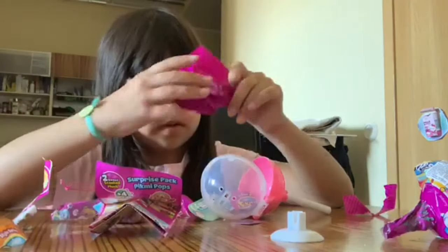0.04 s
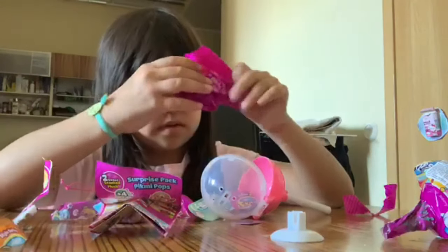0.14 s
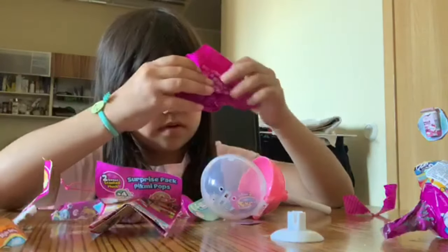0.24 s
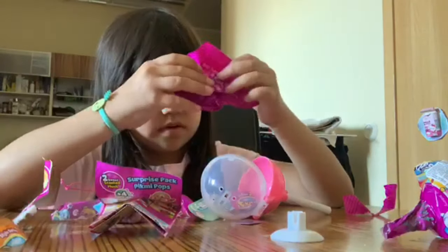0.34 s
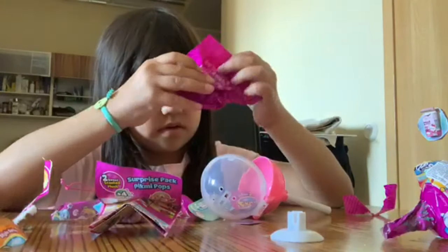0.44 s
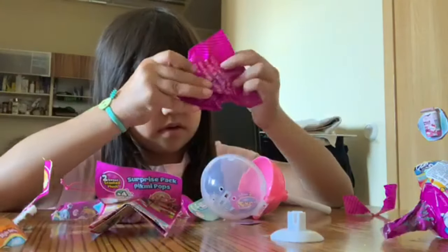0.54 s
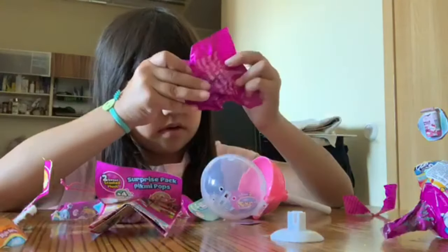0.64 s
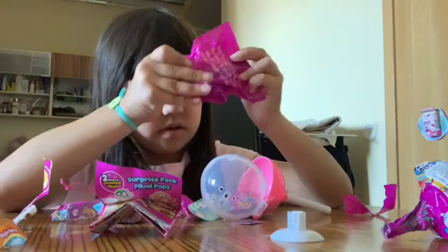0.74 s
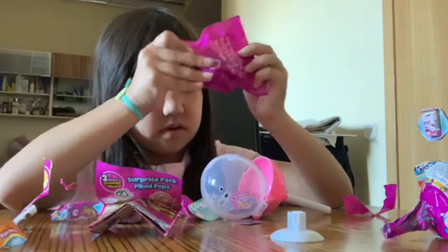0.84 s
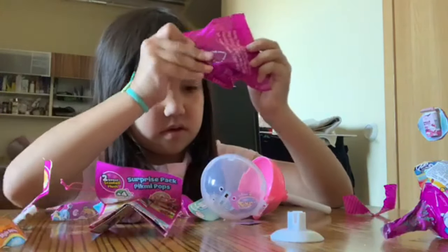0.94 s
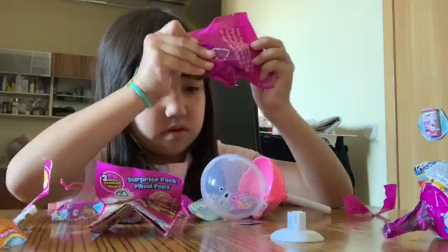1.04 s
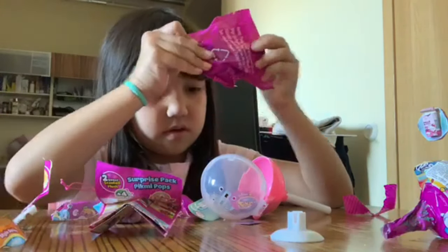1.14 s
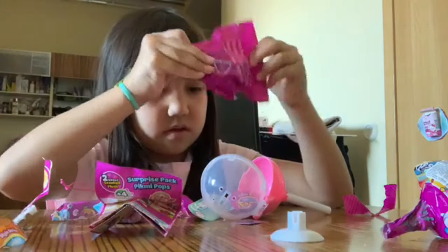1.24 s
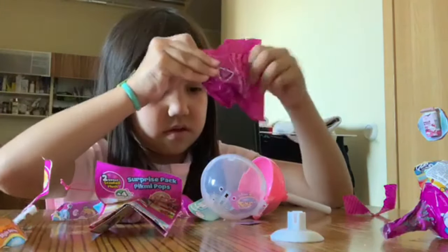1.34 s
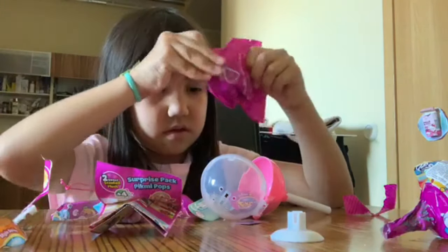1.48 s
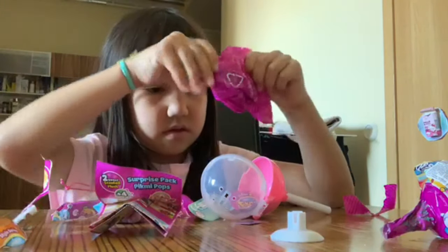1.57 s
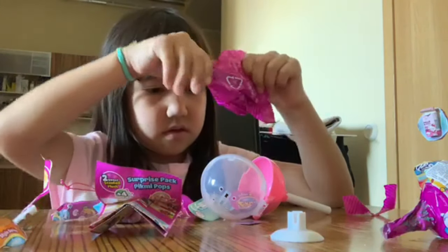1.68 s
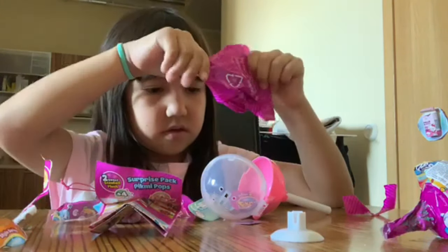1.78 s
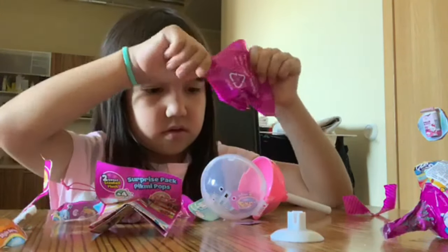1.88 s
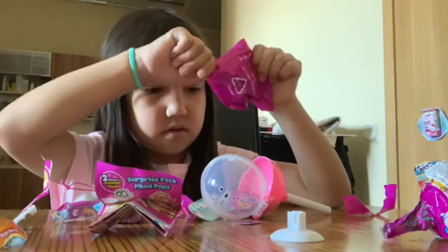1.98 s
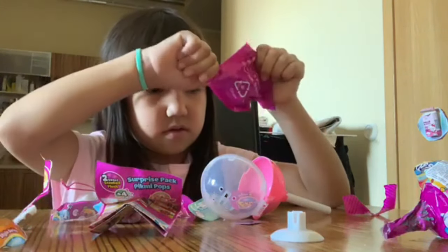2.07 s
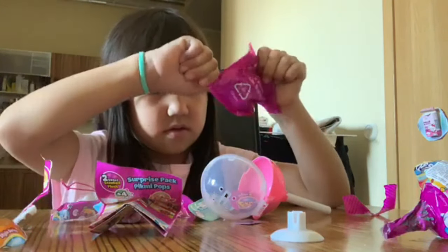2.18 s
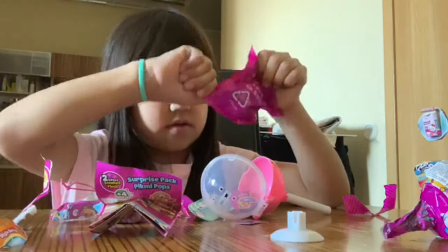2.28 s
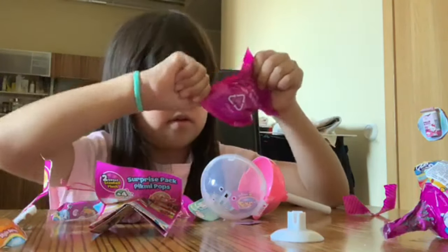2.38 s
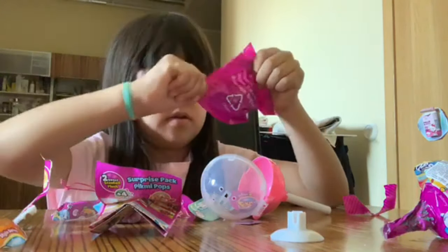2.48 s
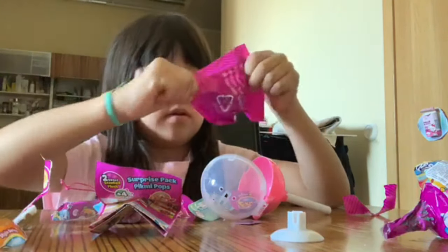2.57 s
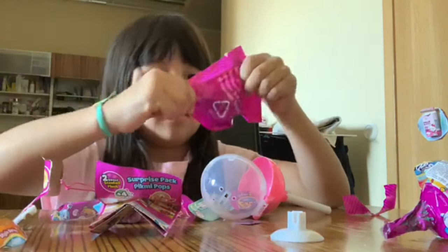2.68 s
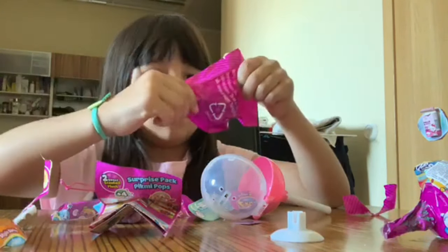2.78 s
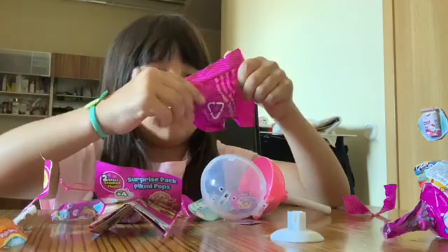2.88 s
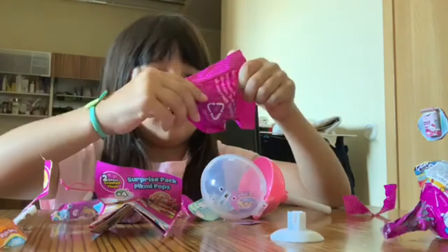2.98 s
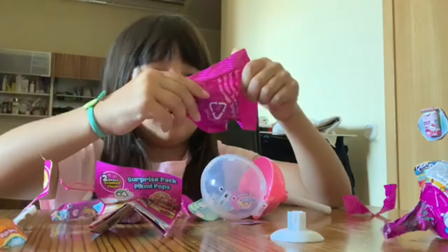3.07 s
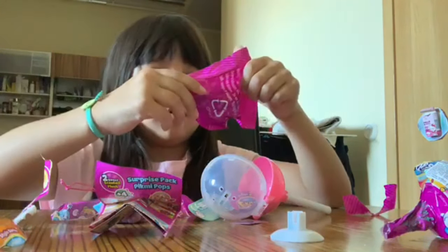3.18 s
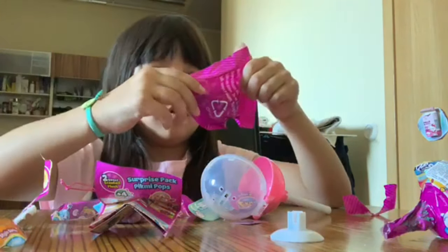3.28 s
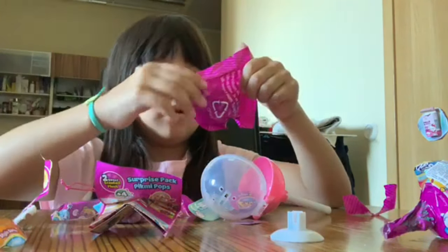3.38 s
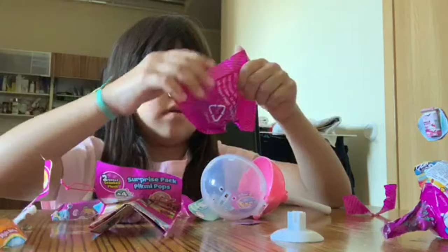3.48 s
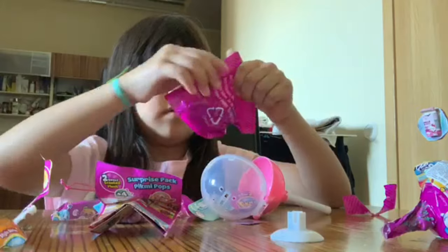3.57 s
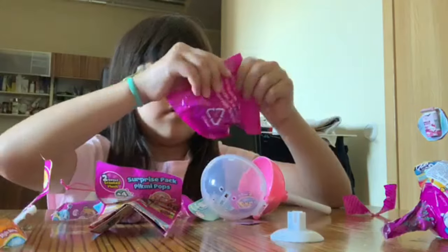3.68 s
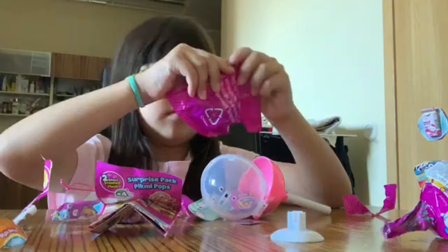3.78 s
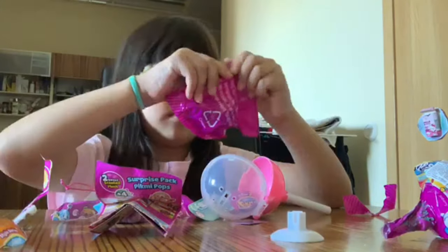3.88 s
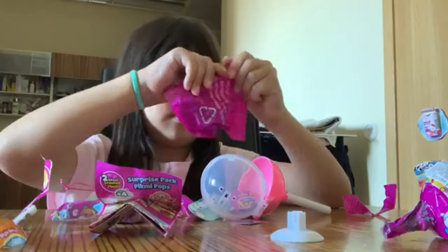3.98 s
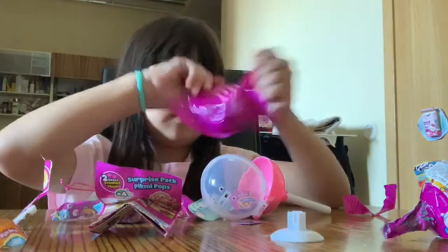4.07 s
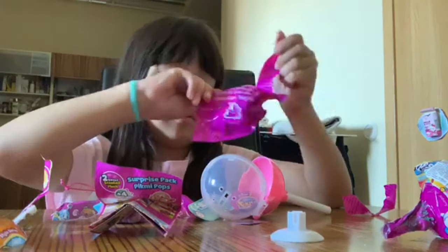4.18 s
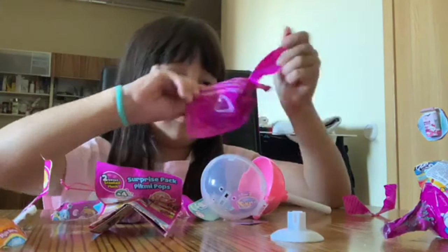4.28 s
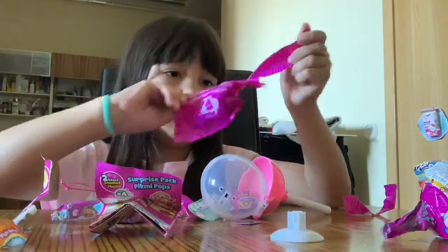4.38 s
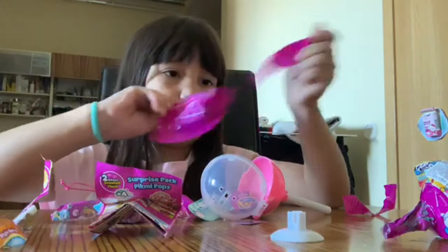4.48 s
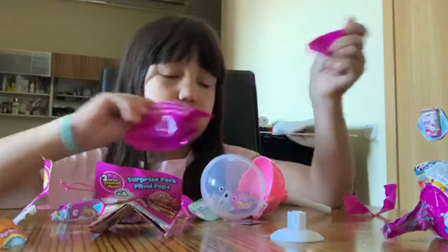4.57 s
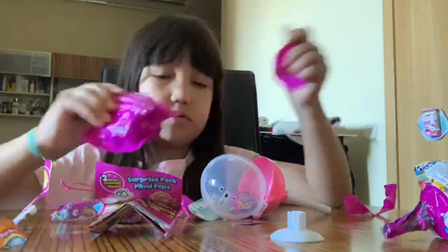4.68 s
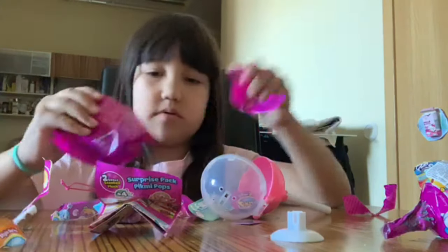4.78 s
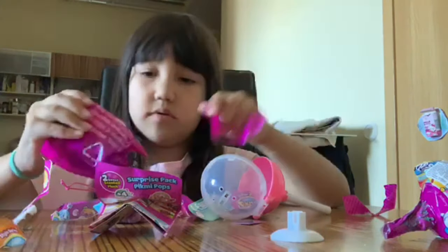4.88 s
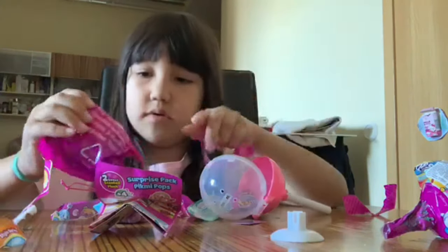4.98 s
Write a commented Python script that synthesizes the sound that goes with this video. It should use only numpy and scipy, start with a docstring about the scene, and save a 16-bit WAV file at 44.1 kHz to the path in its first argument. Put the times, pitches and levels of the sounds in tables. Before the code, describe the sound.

Hands crinkle a small foil packet close to the microphone, making irregular sharp snaps and swells of fine crackle with each squeeze. About halfway the packet jerks with a soft thump, a finger briefly drags across it, and the handling thins out. Then, with another thump, the seam rips open in three quick jerks. A last flurry of snaps dies down. The quiet room hums faintly and adds a slight echo.

```python
"""A quiet room hums. From the first instant, hands crinkle a foil packet above a table, close to a
two-port microphone: each buckle of the foil snaps, fine crackle swells with each squeeze, the walls answer.
At 2.1 s the packet jerks with a soft thump; at 2.5 s a finger drags across it, and the handling thins out.
Just after 4 s another thump, and the seam rips open in three jerks. A last flurry of snaps, with a third
thump, dies down towards 5 s."""
import sys
import numpy as np
from scipy import signal
from scipy.fft import rfft, irfft, next_fast_len
from scipy.io import wavfile
from scipy.ndimage import uniform_filter1d

SR = 44100
rng = np.random.default_rng(int(sys.argv[2]) if len(sys.argv) > 2 else 0)


def inscribe(sig):
    """Save sig as 16-bit PCM at rate SR to the path in sys.argv[1].

    A 1-D sig is mono; a 2-D sig holds one channel per row.
    Samples are clipped to [-1, 1] before scaling.
    """
    pcm = np.round(np.clip(np.atleast_2d(sig).T, -1, 1) * 32767)
    wavfile.write(sys.argv[1], SR, pcm.astype(np.int16))


N = 221815

# room tone spectrum, the sub bass and the rest: f/Hz, relative level/dB
SUB_TONE = [(10, -23.5), (30, 3.5), (60, -8.0)]
ROOM_TONE = [(90, -2.5), (230, -9), (669, -15.5), (820, -12), (1080, -21), (7530, -45), (8580, -68),
             (9360, -70), (15500, -71.5), (16500, -63)]
# two low drones wax and wane: t/s, lower drone/dB, upper drone/dB
DRONE_FADES = [(0.0, -54.5, -57), (1.5, -55.5, -62.5), (1.9, -78, -56), (2.4, -57, -59.5),
               (3.6, -54.5, -58), (4.0, -74.5, -57), (5.03, -57, -51)]
# how alike the room sounds in the two ports: f/Hz, correlation
ROOM_LIKENESS = [(60, 0.89), (250, 0.96), (450, 0.55), (800, 0.13), (1400, 0.096), (3000, 0)]
# fingers squeeze: full pressure at t/s, hold/s, crackle level/dB, relative pops/dB, relative ticks/dB
SQUEEZE_CUES = [(0.001, 0.0084, -53, -6, 6), (.1, 0.29, -54, -4.5, -7), (.56, 0.01, -46, -1.5, -4),
                (.72, 0.12, -43, -6, -1.5), (.97, 0.076, -42, -10, -5), (1.27, 0.032, -48, -7, -3),
                (1.58, 0.053, -45.5, -8.5, -6), (1.92, 0.24, -44, -12.5, -11), (2.52, 0.14, -45, -22, -7),
                (3.8, 0.049, -49.5, -5, -5), (4.4, 0.18, -48, -8, -4), (4.78, 0.053, -56.5, -19, -6)]
# the foil buckles: t/s, level/dB, centre f/Hz, relative low pop/dB, relative bright tick/dB
BUCKLE_CUES = [(0.018, -49, 2520, 7, 14), (0.0473, -22, 2210, -9.5, 4), (0.053, -16.5, 2520, -14, -10),
               (0.1206, -28, 3850, -30, -13), (0.1713, -23, 2630, -10, 9), (0.1992, -29, 2520, -23, 6),
               (0.2214, -24.5, 1940, -30, -7), (0.2508, -28.5, 1750, -33, -29),
               (0.2558, -26.5, 3170, -38, 5.5), (0.319, -27, 1740, -16, -28),
               (0.3315, -22.5, 1930, -31, -14), (0.3621, -28.5, 2430, -37, 16.5),
               (0.3706, -25, 2540, -32, -2), (0.38, -26, 1520, -7.5, -7), (0.4309, -35, 2100, -8, 14),
               (0.4753, -34, 1310, -4, -20), (0.5191, -28, 1940, -13, 4), (0.5449, -13, 2070, -11.5, 5.5),
               (0.5484, -19, 1690, -23, 5.5), (0.567, -24, 3700, -4.5, -12), (0.5901, -27, 3070, -14, 6),
               (0.6513, -10.5, 2300, -8, -11), (0.678, -36, 2500, -8, 12), (0.6871, -14, 1730, -6.5, -5),
               (0.729, -27, 1960, -1, 0), (0.762, -27.5, 2000, -4, 13.5), (0.786, -11, 1800, -26, -4),
               (0.8169, -30, 2060, -16, 6), (0.8782, -25.5, 1900, -35, -3.5),
               (0.9257, -20.5, 3260, -17, -12), (0.9435, -22.5, 2000, -12, -37),
               (0.958, -19.5, 1480, -29, -19), (0.9639, -21.5, 1450, -7.5, -6),
               (0.976, -21, 2650, -16, -13), (0.987, -26, 2550, -9, -16), (0.9974, -21, 1970, -11, 3),
               (1.0016, -15.5, 1820, -15, -1.5), (1.0073, -32, 2500, -7, 2),
               (1.019, -21.5, 1700, -18, -2.5), (1.0315, -26, 2360, -2.5, -2),
               (1.0761, -15.5, 2400, -4, -16.5), (1.13, -24.5, 1240, -15, -74), (1.196, -34, 1350, 2.5, -9),
               (1.206, -34, 1510, -12, -24), (1.237, -22, 1400, -17, -12.5), (1.2548, -23, 1930, -5.5, 2),
               (1.2679, -23.5, 2460, -33, 3.5), (1.304, -24.5, 2260, -10, -10), (1.357, -28, 2000, -10, -4),
               (1.3742, -26.5, 1360, 0, -10), (1.419, -45.5, 2680, 11.5, 20), (1.44, -36, 1410, 4, -21),
               (1.5071, -29.0, 1500, -1, -33), (1.5377, -18, 1700, -13.5, -4),
               (1.5668, -13.5, 1940, -22, 2), (1.6424, -31, 2220, -13, 15), (1.6538, -27.5, 1510, -3, -26),
               (1.7114, -31, 2360, -2, 3), (1.795, -34.5, 2870, -27, -9), (1.8487, -24.5, 1890, -5.5, -16),
               (1.8573, -29, 1440, 0.5, -17), (1.874, -17.5, 3050, -17, -5.5), (1.901, -23, 2200, 2, 11),
               (1.9118, -17.5, 2600, -19, 1.5), (1.9171, -21.5, 2280, -2, 7), (1.945, -21, 1900, -2, 7),
               (1.9512, -18, 1830, -6, -2), (1.9548, -24.5, 1800, -8, 6), (1.971, -39, 1200, 5, -15),
               (1.981, -24.5, 2180, -10, 3), (1.993, -20, 2350, -5.5, -10), (2.0121, -16.5, 2100, -16, 3),
               (2.02, -33, 2500, -22, 10.5), (2.026, -22.5, 2640, -24, 2), (2.0337, -25.5, 1140, -3, -16),
               (2.062, -25.5, 2870, -22, 13), (2.065, -25, 2510, -16, 3), (2.0747, -24, 1320, -22, -3),
               (2.082, -28, 2060, -7, 1), (2.1146, -26.5, 1400, -10, -1), (2.1246, -30, 3650, -17, 13.5),
               (2.131, -25.5, 2500, -19, -4), (2.1566, -35, 1700, -23, -15), (2.2007, -26, 2120, -11, -2),
               (2.2108, -21, 2050, -14, 8.5), (2.259, -29.5, 2410, -19, -3),
               (2.2803, -28.5, 2380, -22, -2.5), (2.322, -24.5, 1440, -32, -3),
               (2.3494, -26.5, 3760, -40, 6), (2.3793, -19.5, 4950, -22, -18),
               (2.457, -44.5, 2500, -15, 15.5), (2.474, -26, 1650, -10, -20), (2.484, -34, 1400, -8, -27),
               (2.4983, -24, 1350, -13, -8.5), (2.555, -34, 2500, -13, -1), (2.565, -22.5, 2650, -10, -5),
               (2.5834, -17, 2060, -5.5, -2.5), (2.592, -36.5, 2200, 4, 4), (2.6172, -18.5, 3270, -13, 0.5),
               (2.6318, -22.5, 2670, -8, -7), (2.661, -30.5, 1780, 5.5, -21),
               (2.692, -29.5, 2730, -26, -17), (2.7151, -29, 2700, -13, -4.5),
               (2.7456, -33, 2280, -5.5, -3), (2.8461, -29, 2400, -16, -15),
               (2.8683, -30.5, 2520, -13, -20), (2.932, -34.5, 3100, -8.5, -11),
               (2.9394, -30, 1760, -25, -36), (3.009, -37.5, 2360, -7.5, -44), (3.0878, -20, 2780, -5, -5),
               (3.2509, -28.5, 2160, -8.5, -4.5), (3.3453, -26, 2940, -6.5, 0.5), (3.5, -40, 2180, -3, 4.5),
               (3.737, -32, 1120, 3.5, -7), (3.7891, -13.5, 2350, -7.5, -9), (3.892, -21, 3100, -12, -8.5),
               (3.937, -34, 2040, -6, 4.5), (3.9958, -23, 2070, -15, -13), (4.048, -24, 1510, -10, -15),
               (4.0582, -22, 2920, -14, -39), (4.0781, -18, 1800, 3, 2), (4.0838, -18.5, 2850, 0, 2),
               (4.089, -15.5, 3080, -11, -22), (4.105, -21, 2200, -19, -6), (4.108, -13, 2970, -28, -4),
               (4.117, -15, 2900, -20, -10), (4.1229, -14, 2700, -13, -8), (4.1276, -11, 2860, -4, 4.5),
               (4.131, -12, 2520, -8.5, -5), (4.144, -21, 2530, -16, 4), (4.161, -18, 2150, -6.5, -15),
               (4.1637, -18, 3260, -30, -13), (4.1683, -26, 2800, -13, -4), (4.171, -29, 2800, -14, 5),
               (4.1775, -34, 2800, -25, -3), (4.189, -34, 2500, -14, 2), (4.2086, -24.5, 3200, -13, -7),
               (4.2307, -15, 2800, -27, -11), (4.2374, -18, 2760, -12.5, -9),
               (4.359, -22.5, 1950, -20, -0.5), (4.377, -31.5, 2300, -5, 4),
               (4.3872, -18.5, 3130, -19, -1.5), (4.3941, -19, 3220, -7.5, -9), (4.428, -24, 2300, -17, -4),
               (4.448, -34.5, 2660, 1, 15.5), (4.459, -26.5, 1360, -7, -21), (4.5, -24.5, 2020, -2.5, 1.5),
               (4.526, -25.5, 2500, -1, -11), (4.5299, -20, 3290, -10, -18),
               (4.535, -11.5, 2900, -13, -1.5), (4.5385, -13, 2880, -9, 0.5), (4.561, -18, 2500, -22, -22),
               (4.5728, -25, 2600, -18, -8), (4.5777, -13, 2900, -19, -17), (4.6643, -17, 2290, -12, -11.5),
               (4.7186, -28, 3050, -9, -1), (4.732, -22.5, 3200, -18, -25), (4.745, -24.5, 2570, -17, -31),
               (4.7701, -24, 1420, -6.5, -34), (4.799, -24, 2630, -18, 1), (4.8314, -20, 3040, -14.5, -10),
               (4.8814, -33, 1500, -11, -5), (5.0032, -27.5, 2530, -14, -6)]
# spectrum of a foil panel's low pop: f/Hz, level/dB
POP_EQ = [(200, -28), (400, -19.5), (620, -11.5), (740, -6.5), (840, -2), (1000, -7.5), (1300, -13.5),
          (2000, -32.5), (4000, -73)]
# spectrum of a crease's bright tick: f/Hz, level/dB
TICK_EQ = [(2500, -8.5), (4500, -0.5), (6000, -2), (7000, -1.5), (8200, 4), (10000, 3), (13000, 6),
           (16500, 2)]
# peaks and dips from the table and the microphone body: f/Hz, width/Hz, gain/dB
BODY_EQ = [(835, 910, -1.5), (1110, 69, -0.5), (1650, 310, 2.5), (2400, 1340, -5.5), (3320, 160, 1),
           (3540, 300, 1), (3750, 420, -3), (5200, 570, -3), (6240, 1500, 6)]
# the packet's place between the ports: f/Hz, left over right/dB
PAN = [(300, -2), (740, -0.5), (1220, -4.5), (2000, -2), (3300, -1), (5500, 1.5), (12000, 1.5)]
# the right port hears the packet first: f/Hz, phase lead/rad
RIGHT_LEAD = [(500, 0.038), (1100, 0.2), (1750, 0.72), (2400, 1.34), (3500, 1.5), (5400, 2.57),
              (6800, 5.33)]
# the room's reverb by band: f/Hz, t60/s, relative level/dB
REVERB_BANDS = [(120, 0.24, 16.5), (250, 0.19, 14), (976, 0.42, -2), (3200, 0.48, -4), (4700, 0.32, 6),
                (7100, 0.48, 1), (10000, 0.44, -2.5), (15300, 0.35, -6)]
# the whole packet jerks and pushes air: t/s, starting level/dB, starting f/Hz
THUMP_CUES = [(2.113, -30.5, 495), (4.084, -20.5, 475), (4.537, -24.5, 425)]
# fader on the packet's top treble: t/s, gain/dB
SHEEN_FADE = [(2.3, -6), (2.56, -2)]
# the seam gives way: full force at t/s, hold/s, crackle level/dB, relative pops/dB, relative ticks/dB
TEAR_CUES = [(4.08, 0.0063, -36.5, -23, -12), (4.118, 0.014, -24, -13, -6),
             (4.16, 0.0048, -26, -11.5, -2.5)]

SNAP_SAMPLES, PRE_ROLL_SAMPLES = 1024, 64
TIME = np.arange(N) / SR


def gain_of(db):
    """Decibels to gain."""
    return 10 ** (np.asarray(db) / 20)


def unit_rms(x):
    """Each channel at rms 1."""
    return x / np.sqrt(np.mean(x ** 2, -1, keepdims=True) + 1e-20)


def curve(points, hz):
    """A table read on a log frequency axis."""
    f, value = np.transpose(points)
    return np.interp(np.log(hz + 1), np.log(f + 1), value)


def add(mix, s, sound):
    """Mixes a sound in at s seconds."""
    part = mix[:, round(s * SR):][:, :sound.shape[1]]
    part += sound[:, :part.shape[1]]


def resonate(x, hz, width_hz):
    """Two passes through one resonant band-pass."""
    b, a = signal.iirpeak(hz, hz / width_hz, SR)
    return signal.lfilter(b, a, signal.lfilter(b, a, x))


def swells(cues, rise_db_per_s, fall_db_per_s):
    """Power envelopes of gestures that rise, hold and fall; one row per level column."""
    power = 0
    for s, hold_s, db, *relative_db in cues:
        fade_db = rise_db_per_s * np.maximum(s - TIME, 0) + fall_db_per_s * np.maximum(TIME - s - hold_s, 0)
        power = power + gain_of(db + np.array([0, *relative_db])[:, None] - fade_db) ** 2
    return power


def room_tone(level_db=-52.5, patchy_db=0.5):
    """A steady bed of noise with faint drifting patches, nearly mono in the bass."""
    frames, hz = N // 512 + 5, np.fft.rfftfreq(2048, 1 / SR)
    left_re, left_im, other_re, other_im, patches = rng.standard_normal((frames, 1025, 5)).T
    patches = uniform_filter1d(uniform_filter1d(patches, 12, 0), 6, 1)
    likeness = curve(ROOM_LIKENESS, hz)[:, None]
    left = left_re + 1j * left_im
    right = likeness * left + np.sqrt(1 - likeness ** 2) * (other_re + 1j * other_im)
    eq = gain_of(curve(SUB_TONE + ROOM_TONE, hz)[:, None] + patchy_db * patches / patches.std())
    bed = signal.istft(np.array([left, right]) * eq, nperseg=2048, noverlap=1536)[1][:, :N]
    return gain_of(level_db) * unit_rms(bed)


def drones(pitches_hz=(29.1, 51.2), width_hz=7.5):
    """The room's low hum: two narrow, wavering bands of noise, in mono."""
    s, *fades_db = np.transpose(DRONE_FADES)
    out = 0
    for hz, db, noise in zip(pitches_hz, fades_db, rng.standard_normal((2, N + SR))):
        out = out + gain_of(np.interp(TIME, s, db)) * unit_rms(resonate(noise, hz, width_hz)[SR:])
    return out


def squeezes(rest_db=-77):
    """Crackle power as the fingers press, over a floor for the packet merely held."""
    return gain_of(rest_db) ** 2 + swells(SQUEEZE_CUES, rise_db_per_s=125, fall_db_per_s=94.5)


def at_microphone(ports, hz, place, spread_s=0.0023, wander_s=0.00004):
    """Smears, colours and pans snap spectra on their way to the ports; place (0-1) shifts each one."""
    # the treble arrives first; 600 Hz trails by spread_s, the bass by more
    turns = spread_s * 1200 ** 2 / (hz + 600) + hz * (0.0001 - PRE_ROLL_SAMPLES / SR)
    colour_db = sum(db * np.exp(-((hz - f) / width) ** 2) for f, width, db in BODY_EQ)
    left, right = ports * np.exp(2j * np.pi * turns) * gain_of(colour_db)
    pan = gain_of(curve(PAN, hz) / 2)
    left_lag = curve(RIGHT_LEAD, hz) + 2 * np.pi * hz * wander_s * (2 * place - 1)
    return np.array([left * pan * np.exp(-1j * left_lag), right / pan])


def snaps(centre_hz, pop_db, tick_db, slip_s=0.00024, body_top_hz=3860):
    """A crease lets go in quick slips: low pop, hollow body, bright tick. One stereo snap per row."""
    count, t = len(centre_hz), np.arange(SNAP_SAMPLES) / SR
    hz = np.fft.rfftfreq(SNAP_SAMPLES, 1 / SR)
    mid_noise, side_noise = rng.standard_normal((count, SNAP_SAMPLES, 2)).T.swapaxes(1, 2)
    length, place, narrowness = rng.random((count, 3)).T[:, :, None]
    age = t / (slip_s * (0.35 + length) * np.array([1, 1.33])[:, None, None])  # the tick frays out longer
    slips = age ** 0.66 * np.exp(-age)
    # reflections off hands and table
    scatter = gain_of(-17.5) * np.sqrt(slip_s / 0.00028) * np.minimum(age, 1) * np.exp(-t / 0.0028)
    mid = rfft(mid_noise * (slips + scatter))
    side = rfft(side_noise * (slips + scatter)) * 0.34 * hz / (hz + 2000)  # narrower image in the bass
    whitened = np.array([mid + side, mid - side]) / np.sqrt(uniform_filter1d(abs(mid) ** 2, size=30))
    tight, frayed = at_microphone(whitened, hz, place).swapaxes(0, 1)
    octaves = np.log2((hz + 1) / centre_hz[:, None])
    body_eq = gain_of(-(4.5 + 37 * narrowness) * octaves ** 2)
    body_eq += 0.32 * gain_of(-6 * np.log2((hz + 1) / 2400) ** 4)  # a broad hump common to all snaps
    body_eq *= gain_of(-8 * np.clip((hz - body_top_hz) / 300, 0, 1))  # steep shelf
    pop, tick = tight * gain_of(curve(POP_EQ, hz)), frayed * gain_of(curve(TICK_EQ, hz))
    out = 0
    for spectrum, db in ((pop, pop_db), (tight * body_eq, 0), (tick, tick_db)):
        layer = irfft(spectrum)
        smoothed_peak = np.sqrt(uniform_filter1d((layer ** 2).sum(0), size=40).max(1))
        out = out + layer * (gain_of(db) / smoothed_peak)[:, None]
    return out.swapaxes(0, 1)


def crackle(power, creases_per_s=900, size_spread_db=6.5):
    """Tiny creases snap at random in three layers, crisp, dull and bright, each riding a row of power."""
    crisp, dull, bright = np.sqrt(power)
    centres_hz = np.geomspace(1400, 3700, 16)
    sizes = gain_of(size_spread_db * np.minimum(rng.exponential(1, N), 3))
    triggers = sizes * (rng.random(N) < creases_per_s / SR)
    voice = rng.integers(0, len(centres_hz), N)
    solo = np.full(len(centres_hz), 60.)  # dB: plus solos the pop or tick, minus mutes it
    out = 0
    for pop_db, tick_db, level in ((-solo, -solo, crisp), (solo, -solo, dull), (-solo, solo, bright)):
        layer = sum(signal.oaconvolve((triggers * (voice == k))[None], grain, axes=1)[:, :N]
                    for k, grain in enumerate(snaps(centres_hz, pop_db, tick_db)))
        out = out + layer / np.sqrt(np.mean(layer ** 2)) * level
    return out


def buckles(**shape):
    """The foreground hits: one distinct snap each time the foil buckles."""
    s, db, hz, pop_db, tick_db = np.transpose(BUCKLE_CUES)
    out = np.zeros((2, N + PRE_ROLL_SAMPLES))
    for at, level, snap in zip(s, gain_of(db), snaps(hz, pop_db, tick_db, **shape)):
        add(out, at, level * snap)
    return out[:, PRE_ROLL_SAMPLES:]


def reverb(send, wet_db=-11.0, fade_in_s=0.00056):
    """The walls answer with sparse taps of random sign, each band dying at its own speed."""
    taps = np.zeros((2, SR))
    at = np.arange(40, SR - 20, 20) + rng.integers(0, 20, (2, (SR - 41) // 20))
    np.put_along_axis(taps, at, rng.choice([-1., 1.], at.shape), 1)
    hz, t, spectra = signal.stft(taps, SR, nperseg=256)
    likeness = curve(ROOM_LIKENESS, hz)[:, None]  # long waves reach both ports alike
    spectra[1] = likeness * spectra[0] + np.sqrt(1 - likeness ** 2) * spectra[1]
    bands = np.array(REVERB_BANDS)
    t60, start_db = curve(bands[:, :2], hz)[:, None], curve(bands[:, ::2], hz)[:, None]
    tail = signal.istft(spectra * gain_of(start_db - 60 * t / t60), SR, nperseg=256)[1][:, :SR]
    tail *= np.clip(np.arange(SR) / SR / fade_in_s, 0, 1)
    return signal.fftconvolve(send, tail * gain_of(wet_db) / np.linalg.norm(tail[0]), axes=1)[:, :N]


def thumps(attack_s=0.002, t60_s=0.029):
    """The jerking packet pushes air: a few soft low cycles that sag in pitch, in mono."""
    t, out = np.arange(2000) / SR, np.zeros((2, N))
    attack = np.sin(np.pi / 2 * np.minimum(t / attack_s, 1)) ** 2
    for s, db, hz in THUMP_CUES:
        tone = np.sin(2 * np.pi * hz * t * (1 - 2 * t))
        add(out, s, (gain_of(db - 60 * t / t60_s) * attack * tone)[None])
    return out


def sheen(x, from_hz=11500):
    """The packet's top treble starts subdued and opens up about halfway through."""
    s, db = np.transpose(SHEEN_FADE)
    size = next_fast_len(N)
    high_pass = np.clip((np.fft.rfftfreq(size, 1 / SR) - from_hz) / 2000 + 0.5, 0, 1)
    top = irfft(rfft(x, size) * high_pass, size)[:, :N]
    return x + top * (gain_of(np.interp(TIME, s, db)) - 1)


def finger_rub(at_s=2.5, hold_s=0.032, level_db=-39, panel_hz=840, slips_per_s=1200):
    """Dense uneven slips of skin on foil ring the panel's low resonance."""
    slips = rng.standard_normal(N) * (rng.random(N) < slips_per_s / SR)
    ring = unit_rms(resonate(slips, panel_hz, width_hz=630))
    pan = gain_of(curve(PAN, panel_hz) / 2 * np.array([[1], [-1]]))
    return pan * ring * np.sqrt(swells([(at_s, hold_s, level_db)], rise_db_per_s=1501, fall_db_per_s=502))


def tear():
    """Crackle power as the seam gives way in short, loud jerks."""
    return swells(TEAR_CUES, rise_db_per_s=900, fall_db_per_s=408)


def scene():
    """The close packet and its reverb over the room's own noise."""
    handling = crackle(squeezes() + tear()) + thumps() + finger_rub()
    direct = buckles() + handling
    # shorter slips for the send: summed over all directions a snap has a smoother spectrum
    send = buckles(slip_s=0.0001) + handling
    return sheen(direct + reverb(send)) + room_tone() + drones()


def record(dry, shared_hz=6900, in_phase_hz=10120, turn_hz=3050, low_hz=26, shelf_hz=15700, top_hz=17000):
    """The right channel's treble is mostly a late copy of the left; then EQ, clipping and a band limit."""
    size = next_fast_len(N)
    hz = np.fft.rfftfreq(size, 1 / SR)
    left, right = rfft(dry, size)
    share = np.clip((hz - shared_hz) / 1200 + 0.5, 0, 0.9)
    late_left = left * np.exp(-2j * np.pi * (hz - in_phase_hz) / turn_hz)  # 1 / turn_hz seconds late
    right = share * late_left + np.sqrt(1 - share ** 2) * right
    low_cut = hz ** 4 / (hz ** 4 + low_hz ** 4)
    high_shelf = gain_of(-13 * np.clip((hz - shelf_hz) / 200, 0, 1))
    out = np.clip(irfft(np.array([left, right]) * low_cut * high_shelf, size)[:, :N], -1, 1)
    return signal.oaconvolve(out, signal.firwin(511, top_hz, window=("kaiser", 9), fs=SR)[None], "same")


dry = scene()
out = record(dry)
inscribe(out)
```